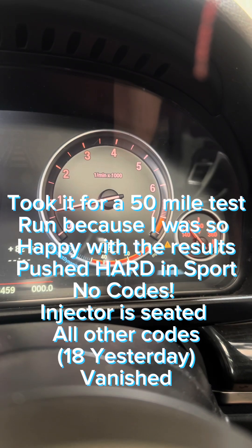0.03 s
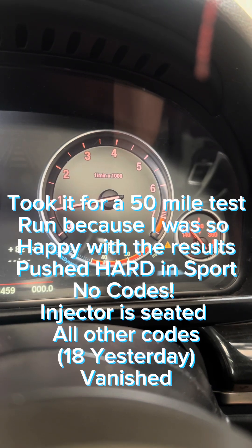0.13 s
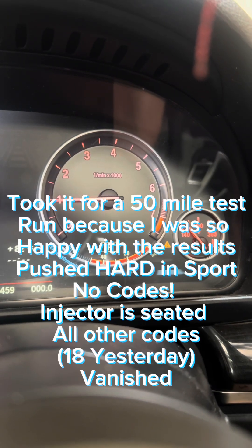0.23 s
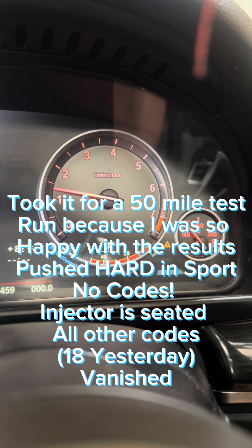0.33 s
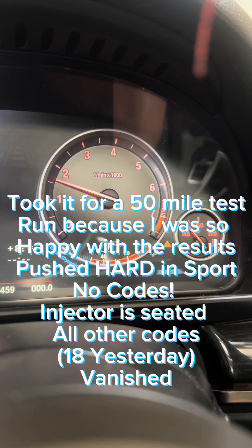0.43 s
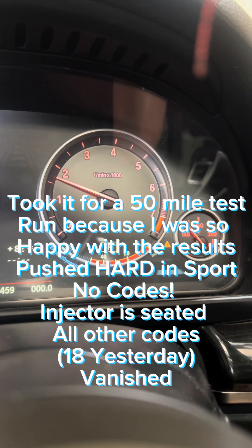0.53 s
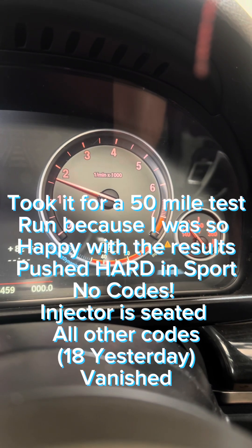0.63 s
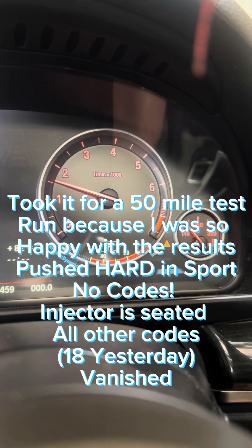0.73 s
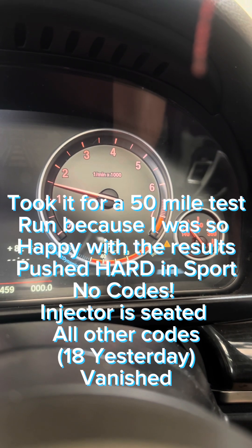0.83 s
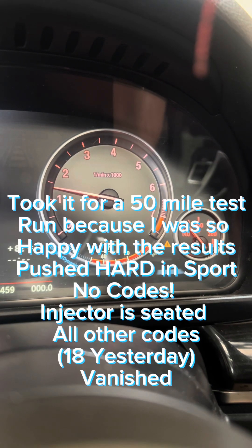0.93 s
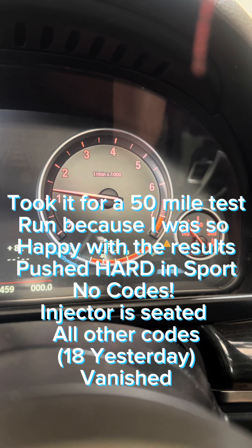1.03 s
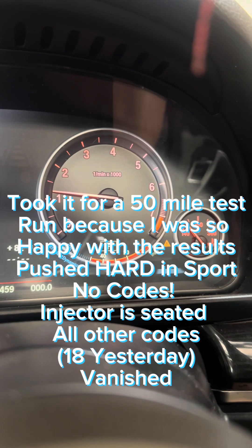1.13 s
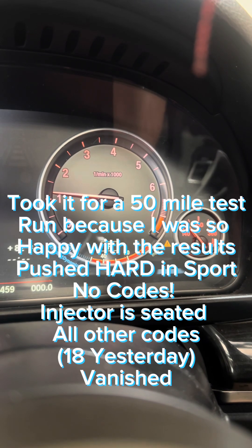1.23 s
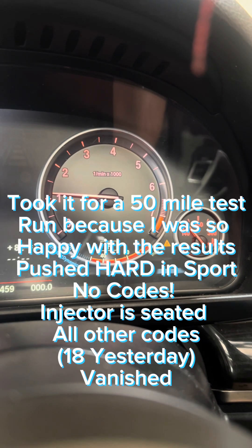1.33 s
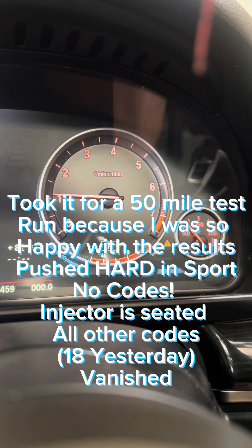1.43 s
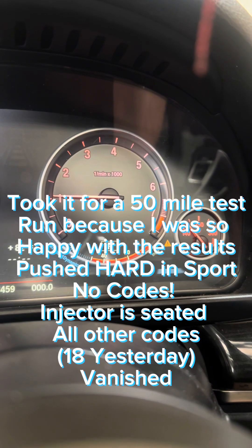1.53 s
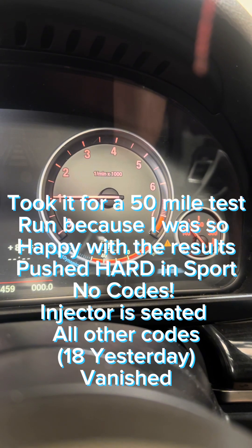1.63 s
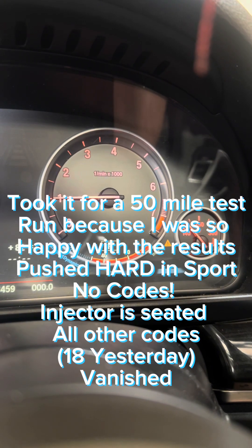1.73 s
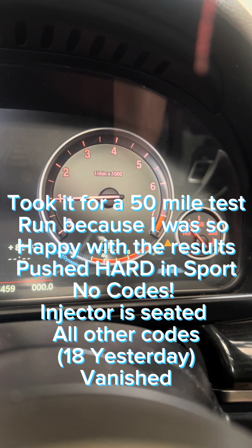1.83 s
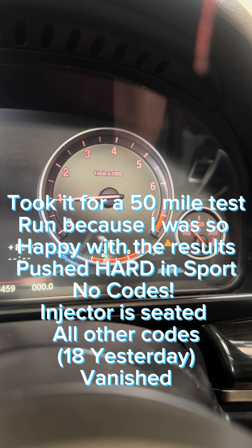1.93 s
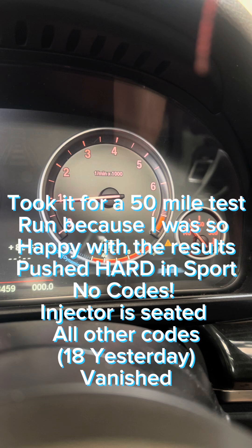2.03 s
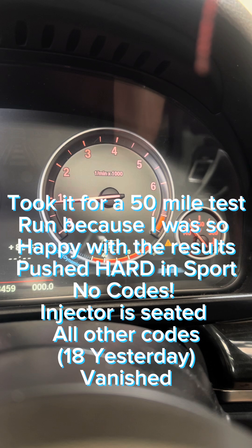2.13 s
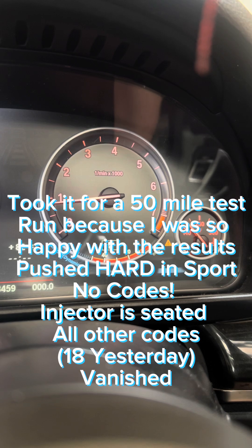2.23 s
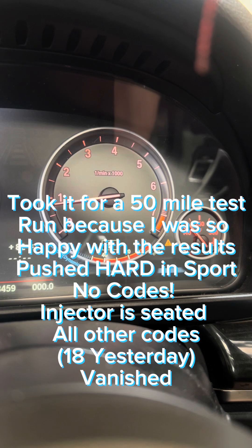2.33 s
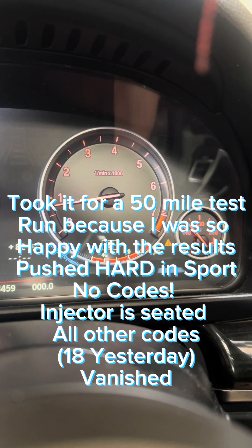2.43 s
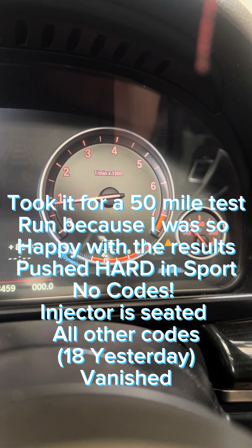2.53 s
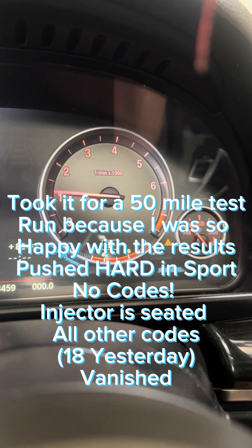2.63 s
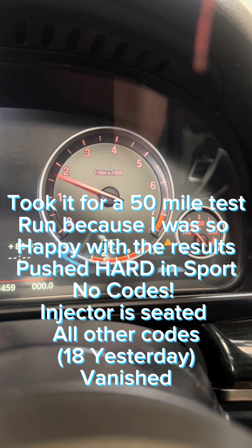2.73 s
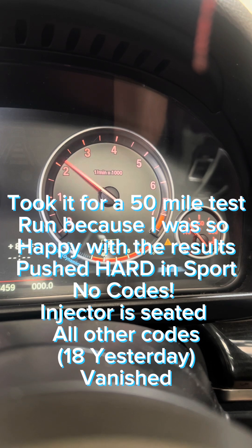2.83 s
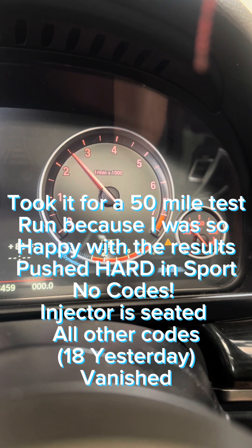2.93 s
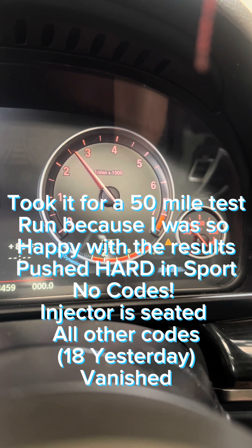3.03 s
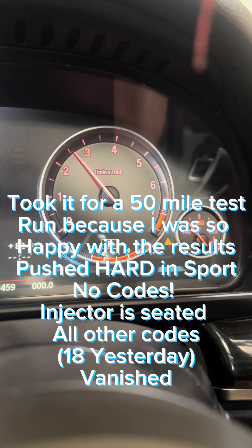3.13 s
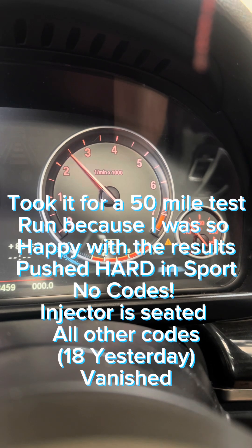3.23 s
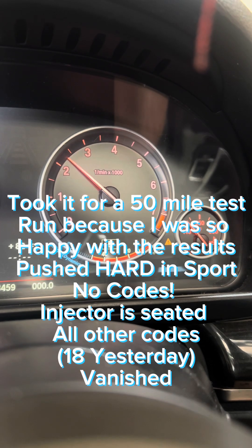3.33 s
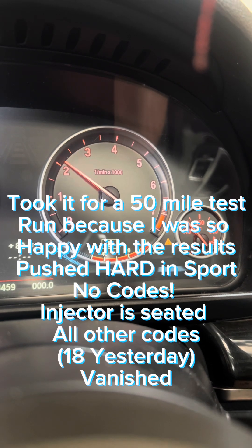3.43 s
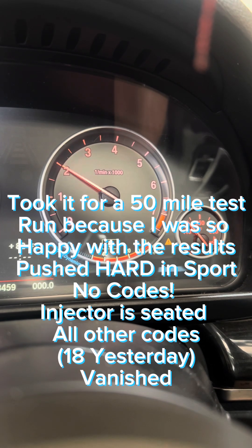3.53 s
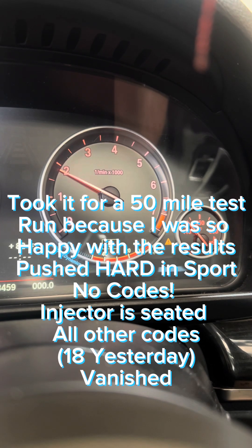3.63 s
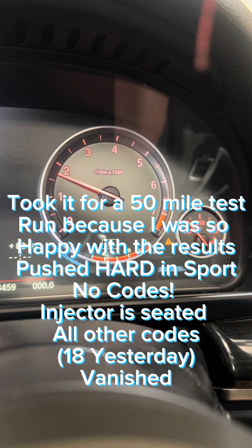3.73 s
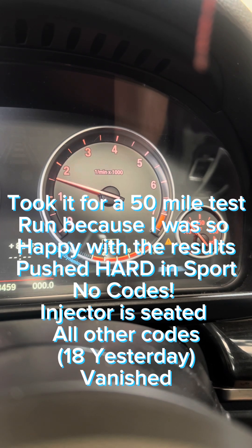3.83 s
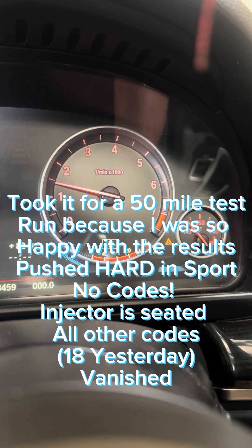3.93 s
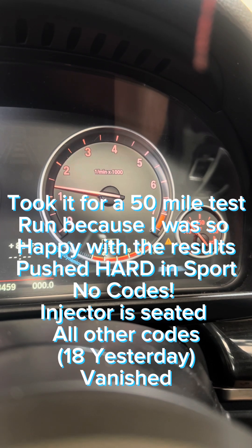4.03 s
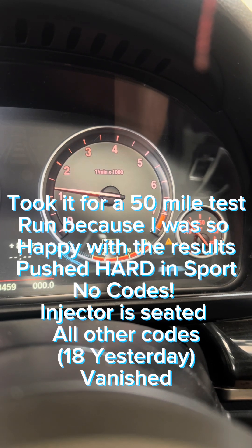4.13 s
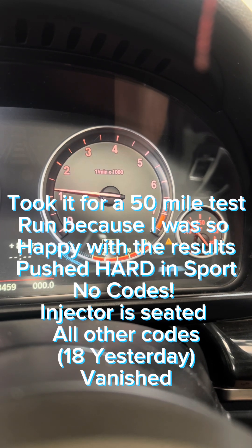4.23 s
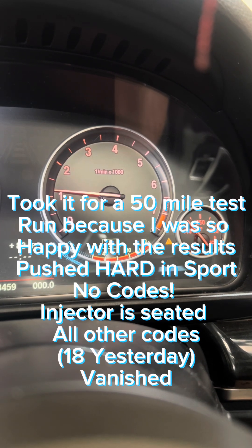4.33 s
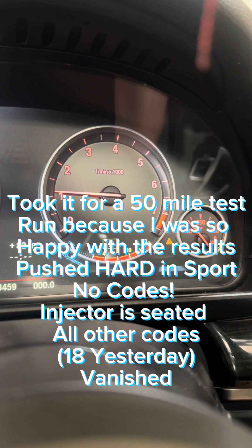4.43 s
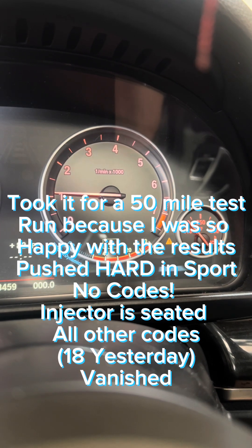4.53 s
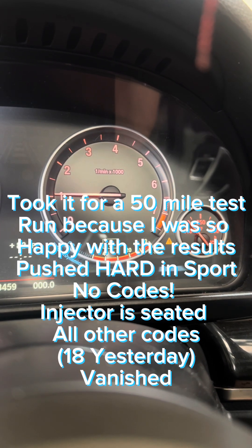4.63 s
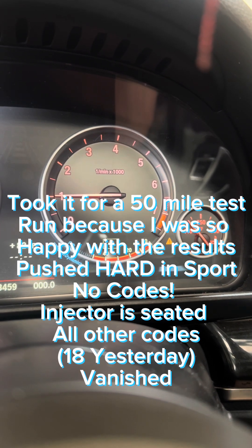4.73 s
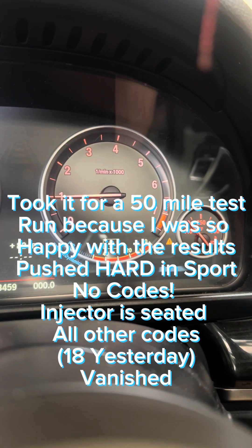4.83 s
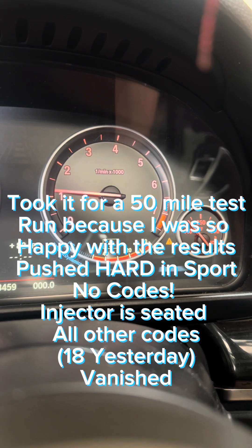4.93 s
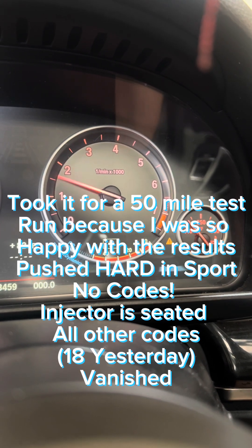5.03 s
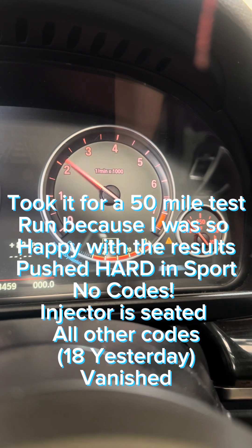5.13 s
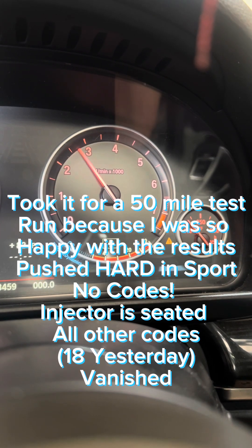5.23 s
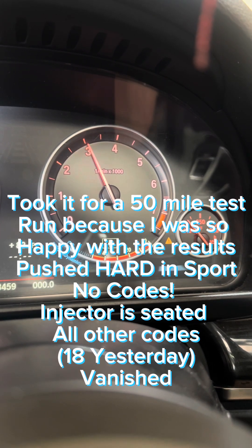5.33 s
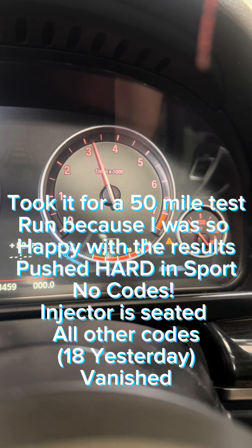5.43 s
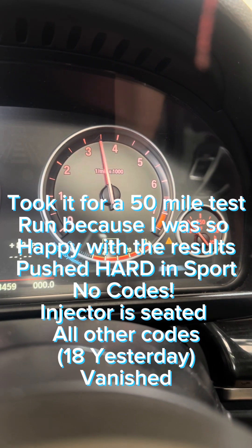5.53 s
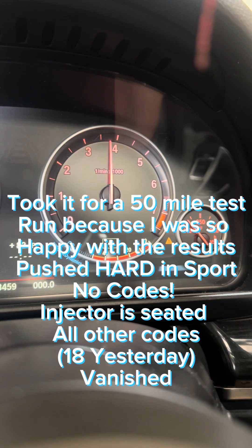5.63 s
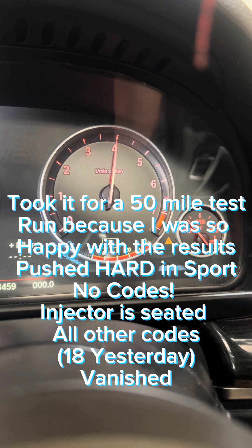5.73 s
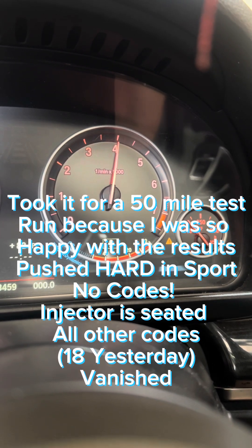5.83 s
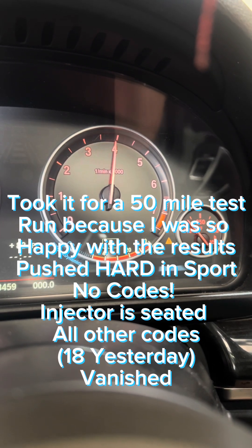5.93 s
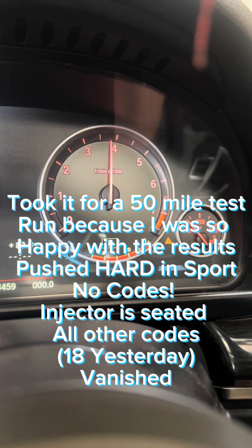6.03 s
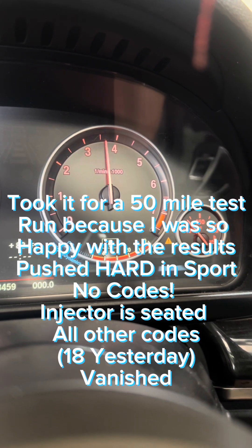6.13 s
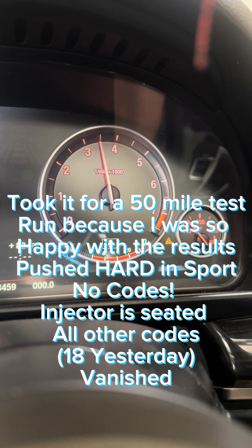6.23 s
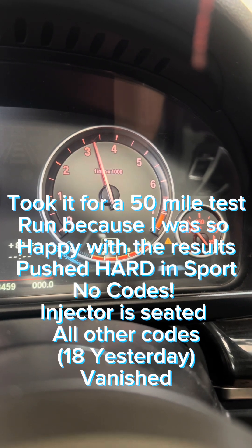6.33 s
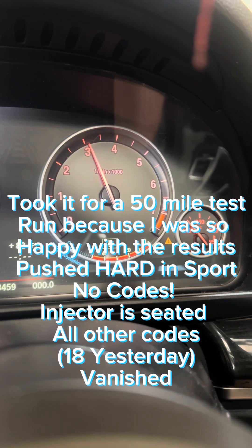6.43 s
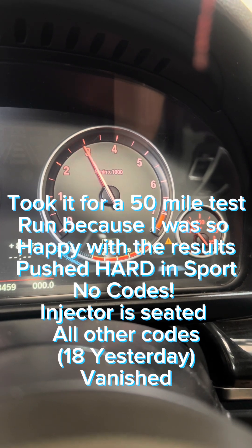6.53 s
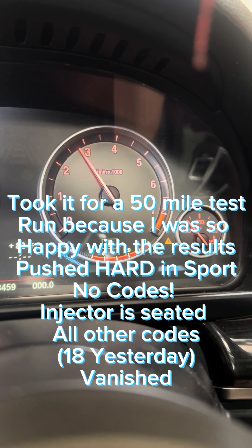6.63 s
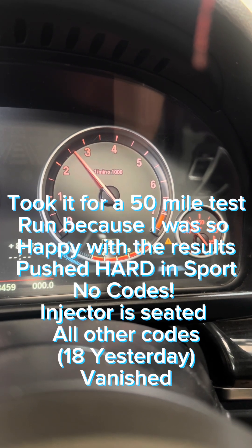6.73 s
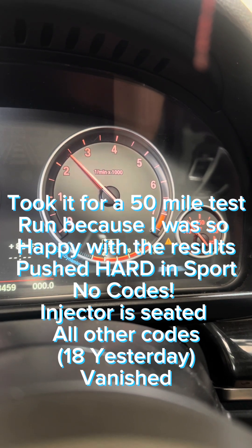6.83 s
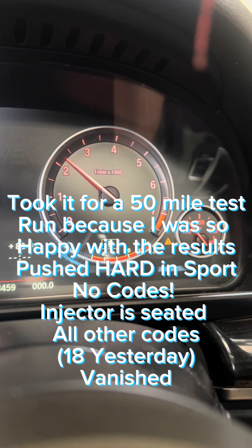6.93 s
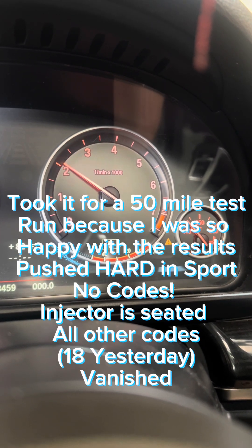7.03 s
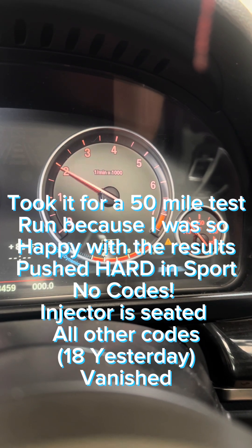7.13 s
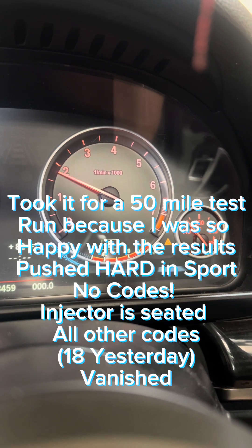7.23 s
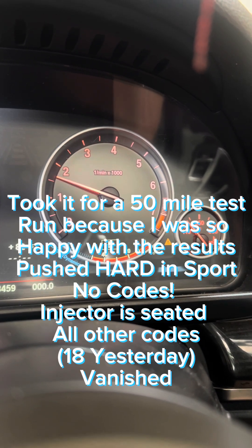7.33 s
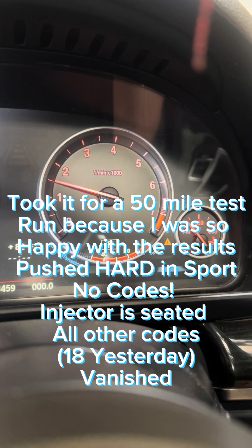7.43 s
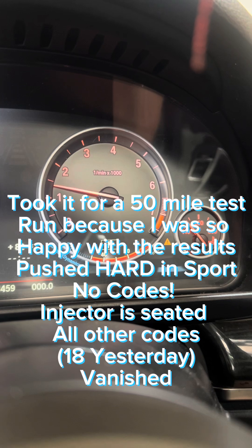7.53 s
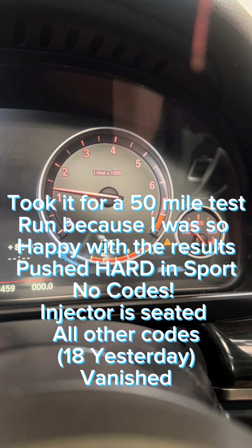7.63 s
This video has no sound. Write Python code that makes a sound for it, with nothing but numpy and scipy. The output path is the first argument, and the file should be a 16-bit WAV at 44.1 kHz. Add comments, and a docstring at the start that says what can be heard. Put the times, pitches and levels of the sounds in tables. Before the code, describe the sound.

Inside a closed car cabin, a parked turbocharged V8 falls from a blip, then revs hard twice, booming, droning and popping back to idle.

```python
"""A turbocharged cross-plane V8, parked, is blipped and then revved twice; a phone records it in the closed cabin.
Engine orders and uneven firings ring the cabin air as boom and drone; each firing adds a rasping puff of gas.
The engine bay hisses louder with speed, injectors sizzle, and a turbocharger whirrs as spare air rushes out.
Off the throttle the note falls and the exhaust burbles and pops on the way back to idle."""
import sys
import numpy as np
from scipy import signal
from scipy.fft import rfft, irfft, next_fast_len
from scipy.io import wavfile
from scipy.ndimage import uniform_filter1d, minimum_filter1d

SR = 44100
rng = np.random.default_rng(int(sys.argv[2]) if len(sys.argv) > 2 else 0)


def pcm_store(signal):
    """Save signal as 16-bit PCM."""
    levels = np.round(np.clip(np.atleast_2d(signal), -1, 1) * 32767)
    wavfile.write(sys.argv[1], SR, levels.astype(np.int16).T)


N = 338247
T = np.arange(N) / SR
SIZE = next_fast_len(N + SR // 2, real=True)  # room for echo tails
HZ = np.arange(SIZE // 2 + 1) * SR / SIZE + 1e-3  # never quite zero, for the logarithms
IDLE_HZ = 7.67  # reference idle, four-stroke cycles per second; eight firings a cycle


def undb(db):
    """Decibels to gain."""
    return 10 ** (np.asarray(db) / 20)


def curves(table):
    """Each column of a table, joined by straight lines in time."""
    times, *columns = np.transpose(table)
    return [np.interp(T, times, column) for column in columns]


def unit(x):
    """Scale to rms 1."""
    return x / np.sqrt(np.mean(x ** 2))


def steady(x, span_s):
    """Scale to rms 1 over a sliding span."""
    power = uniform_filter1d(x ** 2, int(span_s * SR))
    power = uniform_filter1d(power, int(span_s * SR / 2))
    return x / np.sqrt(np.abs(power) + 1e-12)


def through(x, response):
    """Pass a sound through a frequency response."""
    return irfft(rfft(x, SIZE) * response, SIZE)[..., :N]


def delay(seconds):
    """Response of a pure delay."""
    return np.exp(-2j * np.pi * HZ * seconds)


def colour(points):
    """Causal, minimum-phase response of an outline of f/Hz, level/dB."""
    hz, db = np.transpose(points)
    log_gain = np.log(undb(np.interp(np.log(HZ), np.log(hz), db)))
    cepstrum = irfft(log_gain, SIZE)
    return np.exp(rfft(2 * cepstrum[:SIZE // 2], SIZE) - cepstrum[0])


def resonance(hz, width_hz, db):
    """Response of one damped mode."""
    return undb(db) / (1 + 1j * (HZ ** 2 - hz ** 2) / (HZ * width_hz))


def ringing(outline, modes):
    """A broad outline with modes standing up from it."""
    return colour(outline) * (1 + sum(resonance(*mode) for mode in modes))


def noise():
    """Two unrelated noises, one for each side of the cabin."""
    return rng.standard_normal((2, N))


def wander(rate_hz):
    """Smooth chance, rms 1."""
    knots = rng.standard_normal(int(3 * rate_hz * N / SR) + 4)
    return unit(np.interp(3 * rate_hz * T, np.arange(len(knots)), knots))


def swell(start_s, end_s, attack_s, release_s):
    """Attack, hold and release, 0-1."""
    rise = 1 - np.exp(-np.maximum(np.minimum(T, end_s) - start_s, 0) / attack_s)
    return rise * np.exp(-np.maximum(T - end_s, 0) / release_s)


def interior(x, t60_s=0.15, echo_db=-2.5, lead_s=0.000088):
    """A sound reaches the left microphone first, then glass and trim scatter it briefly around both."""
    tail = noise() * undb(-60 * T / t60_s)
    tail = tail / np.sqrt(np.sum(tail ** 2, axis=1, keepdims=True))
    direct = delay(np.array([[0], [lead_s]]))
    response = direct + undb(echo_db) * rfft(tail, SIZE)
    # the many reflections leave fine ripples but no broad colour
    return through(x, response / np.sqrt(uniform_filter1d(np.abs(response) ** 2, size=1100)))


PORT_LAG_S = 10.5 / SR  # time for sound to cross the phone


def ports(sides, far_db):
    """Sound from each side reaches the near microphone first, the far one later, at far_db."""
    return unit(sides + undb(far_db) * through(sides[::-1], delay(PORT_LAG_S)))


# engine speed through the opening blip and the two revs: t/s, f/Hz (four-stroke cycles per second)
BLIP = [(0, 10.2), (.2, 14), (.3, 14.9), (.42, 15.5), (.55, 14.7), (.88, 10.4), (1.22, 8.5), (1.68, 7.3),
        (2.34, 6.5)]
FIRST_REV = [(2.45, 11.5), (2.55, 15.2), (2.65, 19.8), (2.73, 23), (2.82, 23.4), (3, 21.1), (3.3, 17.5),
             (3.45, 15.3), (3.9, 10.8), (4.15, 9.2), (4.35, 8.3), (4.76, 7.6)]
SECOND_REV = [(4.85, 13), (4.95, 18.5), (5.03, 22.8), (5.12, 25.4), (5.2, 26.3), (5.32, 26.3), (5.5, 32.3),
              (5.56, 33.1), (5.7, 32.9), (6, 29.2), (6.4, 23.2), (6.8, 17.9), (7, 15), (7.67, 8.8)]


def engine_speed():
    """Crankshaft speed in four-stroke cycles per second."""
    speed, = curves([*BLIP, *FIRST_REV, *SECOND_REV])
    return speed


# presses of the pedal and what each adds: down t/s, up t/s, boom, drone, rasp and hiss level/dB
PRESSES = [(0, 0.215, 4, 4.5, 9, 3), (2.379, 2.711, 6, 8.5, 12.5, 6), (4.762, 5.068, 1.5, 6, 7, 0),
           (5.344, 5.545, -3.5, 4.5, 8.5, 3.5)]
PRESS_ATTACK_S, PRESS_RELEASE_S = 0.012, 0.056  # cylinder pressure follows the pedal
LOAD_ATTACK_S, LOAD_RELEASE_S = 0.13, 0.18  # the tone of the exhaust follows it more slowly


def pedal():
    """Load on the engine, 0-1, and the dB that the presses add to boom, drone, rasp and hiss."""
    load, push_db = 0, 0
    for down, up, *gains_db in PRESSES:
        load = load + (1 - load) * swell(down, up, LOAD_ATTACK_S, LOAD_RELEASE_S)
        push_db = push_db + np.outer(gains_db, swell(down, up, PRESS_ATTACK_S, PRESS_RELEASE_S))
    return np.clip(load, 0, 1), push_db


def loudness(speed, idle_db, per_octave_db):
    """A layer grows by a fixed number of dB with each doubling of engine speed."""
    return idle_db + per_octave_db * np.log2(speed / IDLE_HZ)


# air noise above what speed and pedal give; rasp and drone take a share of it: t/s, level/dB
AIR_LEVEL = [(0, 4), (.3, 6.5), (1, 6), (2.33, 7.5), (2.39, 4), (2.48, 4.5), (2.6, 9), (2.72, -0.5),
             (2.86, -3), (3.2, 4.5), (3.62, 5.5), (3.72, -2), (4.7, 2.5), (4.95, 7), (5.27, 0.5),
             (5.45, 2.5), (5.53, 3.5), (5.63, 2), (6.6, 0.5), (7.67, 1)]


def air_level():
    """The dB by which the air noise rises and dips."""
    air_db, = curves(AIR_LEVEL)
    return air_db


# the low end shifts briefly, mostly down: start t/s, end t/s, boom level/dB, drone level/dB
LULLS = [(0.247, 0.299, -9.5, 4.5), (0.452, 0.539, 4, -9), (0.99, 1.223, -4.5, -0.5),
         (1.286, 1.322, -12.5, 1.5), (1.553, 1.585, -10.5, -8.5), (1.683, 1.906, -8, 1),
         (2.087, 2.319, -8.5, 1.5), (2.734, 2.944, -3, -2.5), (3.88, 4.03, -4.5, -2.5),
         (4.101, 4.426, -13, -5.5), (4.426, 4.728, -5, -5), (5.228, 5.324, -5, -3),
         (6.963, 7.114, -6.5, -0.5), (7.485, 7.675, -7, -1)]
LULL_FADE_S = 0.0063


def lulls():
    """The dB by which each lull shifts boom and drone."""
    return sum(np.outer(shifts_db, swell(start, end, LULL_FADE_S, LULL_FADE_S))
               for start, end, *shifts_db in LULLS)


# spells of uneven burning off the throttle: start t/s, end t/s, unevenness (0-1)
BURBLES = [(0.55, 0.73, 1), (0.981, 1.17, 0.2), (3.329, 3.636, 0.6), (6.87, 7.305, 0.4), (7.446, 7.55, 0.2)]
BURBLE_ATTACK_S, BURBLE_RELEASE_S = 0.03, 0.08
EVEN_SCATTER, STUMBLE_S = 0.09, 0.07  # smooth running; length of the stumble as the pedal goes down
IDLE_SCATTER, IDLE_SCATTER_SPAN_HZ = 0.15, 7  # burning grows lumpy towards idle


def unevenness(speed):
    """Firings scatter a little always, more near idle, as the pedal goes down and in the burbles."""
    uneven = EVEN_SCATTER + IDLE_SCATTER * np.exp(-((speed - IDLE_HZ) / IDLE_SCATTER_SPAN_HZ) ** 2)
    for down, *_ in PRESSES:
        uneven = uneven + swell(down, down + STUMBLE_S, BURBLE_ATTACK_S, BURBLE_RELEASE_S)
    for start, end, size in BURBLES:
        uneven = uneven + size * swell(start, end, BURBLE_ATTACK_S, BURBLE_RELEASE_S)
    return uneven


# exhaust as the silencer passes it into the cabin: f/Hz, level/dB
MUFFLER = [(20, -45), (38, -22), (45, -11), (55, -4), (68, -10), (80, -11), (95, -10.5), (112, -12),
           (130, -6), (165, -7), (195, -7), (212, -15), (232, -23), (270, -21.5), (330, -34), (450, -38.5),
           (600, -31), (750, -33.5), (1500, -77.5)]
# modes of exhaust and cabin air: f/Hz, width f/Hz, level/dB
CABIN = [(59.4, 5.76, 3), (142.3, 7.2, -4), (186.9, 11, 3), (246.5, 9.8, 11), (299, 14, 3.5)]


def cabin_air():
    """The silencer's outline with the modes of the cabin air on it."""
    return ringing(MUFFLER, CABIN)


# outline of the rasp inside the cabin: f/Hz, level/dB
RASP = [(150, -31.5), (280, 10), (370, 5), (440, -3), (520, 0.5), (800, -4), (1300, -5.5), (1750, -14.5),
        (2000, -12.5), (2450, -22), (3200, -23.5), (6000, -45), (12000, -78.5)]
# pipe and panel resonances: f/Hz, width f/Hz, level/dB
PANELS = [(545, 27, 1), (719, 29, -0.5), (871, 38, 3.5), (1004, 80, -2.5), (1254, 53, -3.5),
          (1600, 220, -0.5), (1670, 240, -27.5)]


def pipes_and_panels():
    """The outline of the rasp with pipe and panel resonances on it."""
    return ringing(RASP, PANELS)


def firings(cycle, sizes):
    """One pulse for each of the eight firings of a cycle."""
    count = (8 * cycle).astype(int)
    return np.diff(count, prepend=0) * sizes[count]


THROB_DEPTH, THROB_SPAN_HZ = 0.13, 1.5


def throb(cycle, speed):
    """Gain of the lumpy idle, one swell a cycle, fading away from idle speed."""
    depth = THROB_DEPTH * np.exp(-((speed - IDLE_HZ) / THROB_SPAN_HZ) ** 2)
    return 1 + depth * np.cos(2 * np.pi * cycle)


# engine orders; the unevenly firing banks give 3 and 5, the firing rate 8:
# multiple of the cycle rate, level/dB on throttle, level/dB off throttle, level/dB near idle
ORDERS = [(2, -8.5, -27.5, -24.5), (3, -10.5, -3.5, -11), (4, -5, -16, -22), (5, -7.5, -6, -19),
          (6, -23, -15, -13.5), (7, -9.5, -16.5, -10), (8, 0, -11, -4), (9, -10, -19.5, -22.5),
          (10, -9, -15.5, -13.5), (11, -6.5, -12, -14), (12, -16, -14, -13), (13, -4.5, -13, -14),
          (14, -20, -23, -15.5), (15, -16.5, -16.5, -20), (16, -9, -12.5, -13.5), (17, -22, -13.5, -19),
          (18, -15, -15, -21), (19, -17, -19.5, -15), (21, -17.5, -15, -20), (24, -13.5, -10.5, -20)]
IDLE_LOAD_SPAN_HZ = 2.8  # the idle governor takes over as the speed sinks this close to idle
# orders WAVER_DEPTH_DB down waver in full, stronger ones less; load steadies them all
WAVER_DB, FLUTTER_DB, WAVER_DEPTH_DB = 2, 2.5, 11


def exhaust(cycle, speed, throttle, uneven, cabin, boom_db, drone_db):
    """Wavering engine orders and scattered firings ring the cabin; an order swells as it crosses a mode."""
    idling = np.exp(-(np.maximum(speed - IDLE_HZ, 0) / IDLE_LOAD_SPAN_HZ) ** 2)
    tone = 0
    for multiple, on_db, off_db, idle_db in ORDERS:
        closed_db = off_db + idling * (idle_db - off_db)
        db = closed_db + throttle * (on_db - closed_db)
        waver_share = np.clip(-db / WAVER_DEPTH_DB, .4, 1.1) * (1 - .6 * throttle)
        db = db + waver_share * (WAVER_DB * wander(4.4) + FLUTTER_DB * wander(18))
        tone = tone + undb(db) * np.sin(2 * np.pi * (multiple * cycle + rng.random()))
    low_band = signal.butter(2, [16, 341], "band", fs=SR, output="sos")
    scatter = signal.sosfilt(low_band, firings(cycle, rng.standard_normal(4096)))
    body = through(tone + uneven * steady(scatter, 0.062), cabin)
    # the lowest air mode booms; the higher ones carry the drone
    low = 1 / (1 + (HZ / 105) ** 16)
    boom = through(body, low) * throb(cycle, speed) * undb(boom_db)
    drone = through(body, 1 - low) * undb(drone_db)
    return boom + drone


# strength of the eight firings in their order: level/dB
CYLINDERS = [1.5, -3, 1, -1.5, 0, 1.5, -3, 0]
# the bank of each firing: 0 near, 1 far
BANKS = [0, 1, 1, 0, 1, 0, 0, 1]
FAR_BANK_LAG_S = 0.0011  # the far bank has the longer pipe


def rasp(cycle, speed, throttle, panels, level_db, sharp=0.61, growl=1.9):
    """Each firing puffs gas; on throttle puffs sharpen and pressure fronts of both banks growl."""
    count = (8 * cycle).astype(int)
    sizes = undb(np.resize(CYLINDERS, 4096) + .8 * rng.standard_normal(4096))
    puff_shape = sizes[count] * np.exp(-sharp * (8 * cycle % 1))
    puffs = rng.standard_normal(N) * puff_shape ** np.sqrt(throttle + 0.15)
    far = np.resize(BANKS, 4096)
    near_fronts = firings(cycle, sizes * (1 - far))
    far_fronts = through(firings(cycle, sizes * far), delay(FAR_BANK_LAG_S))
    growl_level = growl * throttle ** 2 * (speed / speed.max()) ** 2
    fronts = steady(near_fronts + far_fronts, 0.28) * growl_level
    gas = steady(through(steady(puffs, 0.1) + fronts, panels), 0.27)
    return unit(interior(gas)) * undb(level_db)


# engine-bay hiss as it comes into the cabin: f/Hz, level/dB
HISS = [(300, 10), (1000, 12.5), (1700, 13.5), (2500, 9), (3400, 7.5), (5000, 3), (6200, 2), (7700, 3),
        (9500, -8), (11500, -5), (14000, -10.5)]


def engine_bay(cycle, level_db, flutter=0.082):
    """Intake air and valve gear hiss from both sides, fluttering with the firings."""
    hiss = noise() * (1 + flutter * np.cos(2 * np.pi * 8 * cycle))
    sides = interior(through(hiss, colour(HISS)), t60_s=.06, echo_db=2)
    return ports(sides, far_db=-8) * undb(level_db)


def injectors(cycle, level_db=-71, depth=.25):
    """A thin sizzle from the fuel system swells a little once a cycle."""
    sizzle = noise() * (1 + depth * np.cos(2 * np.pi * cycle))
    return ports(through(sizzle, resonance(8100, 6300, 0) ** 2), far_db=0.5) * undb(level_db)


# outline of the crack: f/Hz, level/dB
CRACK = [(200, 12.5), (500, 2), (1200, -1.5), (2200, 0), (2700, -4), (3800, -7), (5000, -31), (8000, -45),
         (13000, -59.5)]
# the tailpipe rings after a crack: f/Hz, width f/Hz, level/dB
PIPE_RINGS = [(590, 40, 5), (1000, 60, 4), (1450, 99, 3), (2240, 90, -4.5), (3100, 95, -2.5)]
# unburnt fuel popping in the exhaust: t/s, thump level/dB, bark level/dB, crack level/dB
POPS = [(0.048, -18.5, -28, -62), (0.091, -7.5, -37, -54), (0.711, -15, -38, -70), (.743, -2, -30, -51),
        (1.142, -10.5, -46, -70), (2.572, -20.5, -30, -39), (2.628, -7.5, -22.5, -46), (2.66, 6, -22, -56),
        (3.365, -1.5, -23.5, -63), (3.398, -26.5, -45.5, -62), (3.485, -7.5, -26, -57),
        (3.529, -9, -35.5, -59), (3.629, -3, -24.5, -21), (3.645, -6.5, -38, -39), (3.788, -11, -38, -68),
        (5.765, 0.5, -31.5, -64), (6.888, -7, -29, -68), (6.926, -8, -29.5, -61), (7.098, -6, -27.5, -37),
        (7.245, -0.5, -24.5, -32.5), (7.268, -9, -50, -48), (7.32, -4, -39.5, -65)]
THUMP_RISE_S, THUMP_S = 0.001, 0.012
BARK_RISE_S, BARK_S, FRONT_DB = 0.0075, 0.044, 2  # the front is set relative to the bark
CRACK_RISE_S, CRACK_S = 0.0014, 0.012  # the silencer rounds the rise
TAIL_DB, TAIL_S = -15, 0.053  # echo outside, relative to the crack


def pops(cabin, panels):
    """A pop thumps the cabin; its front slaps and barks through the panels, cracks and echoes outside."""
    thump, front, bark, crack = np.zeros((4, N))
    for s, thump_db, bark_db, crack_db in POPS:
        start = int(s * SR)
        age = T[:N - start]
        thump[start:] += undb(thump_db) * (1 - np.exp(-age / THUMP_RISE_S)) * np.exp(-age / THUMP_S)
        front[start] += undb(bark_db + FRONT_DB)
        bark[start:] += undb(bark_db) * (1 - np.exp(-age / BARK_RISE_S)) * np.exp(-age / BARK_S)
        decay = np.exp(-age / CRACK_S) + undb(TAIL_DB) * np.exp(-age / TAIL_S)
        crack[start:] += undb(crack_db) * (1 - np.exp(-age / CRACK_RISE_S)) * decay
    cabin_peak = np.abs(irfft(cabin, SIZE)).max()
    thud = through(np.diff(thump, prepend=0), cabin / cabin_peak / (1 + (HZ / 500) ** 4))
    dull, sharp = noise()
    throat = panels * (1 + resonance(930, 13000, -13)) / (1 + (HZ / 2000) ** 4)
    slap = through(front, throat / np.abs(irfft(throat, SIZE)).max())
    barks = bark * unit(through(dull, throat))
    cracks = crack * unit(through(sharp, ringing(CRACK, PIPE_RINGS)))
    return thud + interior(slap + barks + cracks, t60_s=0.083, echo_db=-4.5)


# the whirr and the rush of air: start t/s, end t/s, level/dB
WHIRR = (0.26, 1.5, -55.5)
AIR_RUSH = (.08, .7, -61.5)
TURBO_START_HZ, TURBO_REST_HZ, TURBO_COAST_S = 2160, 1203, 1.3  # pitch sinks from 0 s on


def turbo():
    """The turbocharger coasts down with a faint, breathy whirr while spare air rushes out."""
    hz = TURBO_REST_HZ + (TURBO_START_HZ - TURBO_REST_HZ) * np.exp(-T / TURBO_COAST_S)
    phase = 2 * np.pi * np.cumsum(hz) / SR
    whirr = wander(70) * np.cos(phase) + wander(70) * np.sin(phase)
    air = ports(through(noise(), resonance(9200, 5000, 0) ** 2), far_db=-4)
    whirr_start, whirr_end, whirr_db = WHIRR
    air_start, air_end, air_db = AIR_RUSH
    whirr_level = undb(whirr_db) * swell(whirr_start, whirr_end, attack_s=0.18, release_s=0.33)
    rush_level = undb(air_db) * swell(air_start, air_end, attack_s=0.14, release_s=0.81)
    return interior(whirr * whirr_level) + air * rush_level


# balance of the exhaust between the sides of the cabin: f/Hz, left minus right level/dB
LEAN = [(60, 0), (150, 0.54), (300, 2), (600, 0.4), (1300, 5), (2300, -3.5), (5000, 6)]


def scene(air_in_rasp=0.94, air_in_drone=0.48):
    """One crankshaft drives the exhaust and engine bay; speed and pedal set how loud they are."""
    speed = engine_speed()
    cycle = np.cumsum(speed) / SR
    throttle, (boom_push, drone_push, rasp_push, hiss_push) = pedal()
    boom_lull, drone_lull = lulls()
    air_db = air_level()
    boom_db = loudness(speed, idle_db=-12.5, per_octave_db=7.5) + boom_push + boom_lull
    drone_db = loudness(speed, idle_db=-17.5, per_octave_db=5.5) + drone_push + drone_lull
    drone_db = drone_db + air_in_drone * air_db
    rasp_db = loudness(speed, idle_db=-56.5, per_octave_db=11.5) + rasp_push + air_in_rasp * air_db
    hiss_db = loudness(speed, idle_db=-61, per_octave_db=8.5) + hiss_push + air_db
    cabin, panels = cabin_air(), pipes_and_panels()
    tailpipes = exhaust(cycle, speed, throttle, unevenness(speed), cabin, boom_db, drone_db)
    tailpipes = tailpipes + rasp(cycle, speed, throttle, panels, rasp_db) + pops(cabin, panels)
    lean = colour(LEAN) ** np.array([[.5], [-.5]])  # half to each side
    return through(tailpipes, lean) + engine_bay(cycle, hiss_db) + injectors(cycle) + turbo()


TOP_HZ = 13900  # top of the phone's range


def record(dry, ceiling=0.9):
    """The phone's limiter holds the loudest peaks, and the top is cut."""
    room = np.minimum(1, ceiling / (np.abs(dry).max(axis=0) + 1e-9))
    gain = uniform_filter1d(minimum_filter1d(room, size=700), size=700)
    end_fade = np.minimum(1, (T[-1] - T) / .006)
    top_cut = signal.ellip(8, .2, 70, TOP_HZ, fs=SR, output="sos")
    return signal.sosfilt(top_cut, dry * gain * end_fade)


dry = scene()
out = record(dry)
pcm_store(out)
```